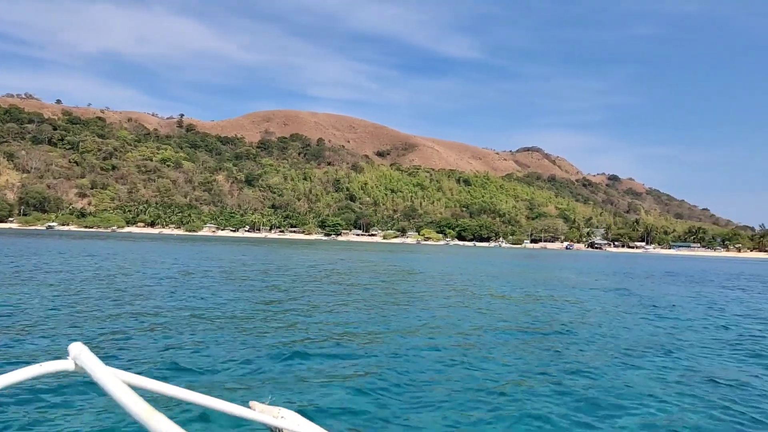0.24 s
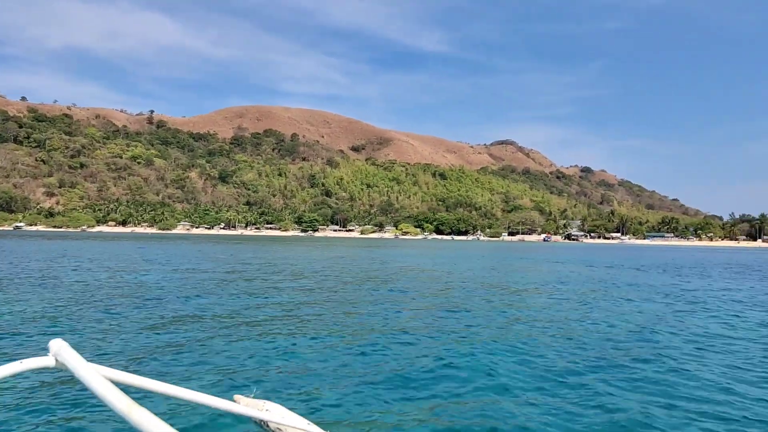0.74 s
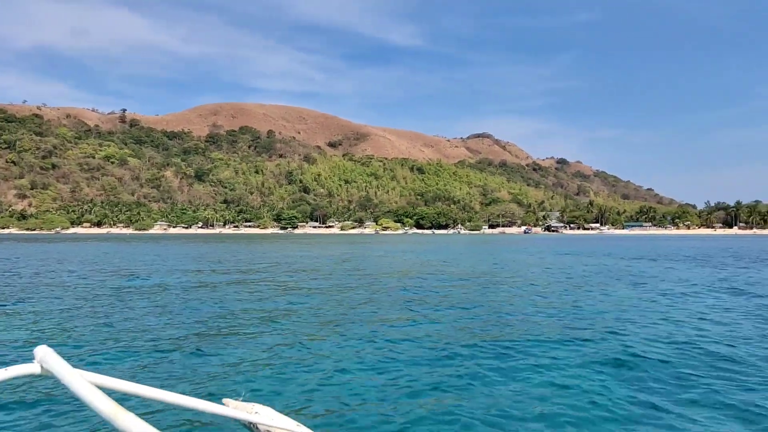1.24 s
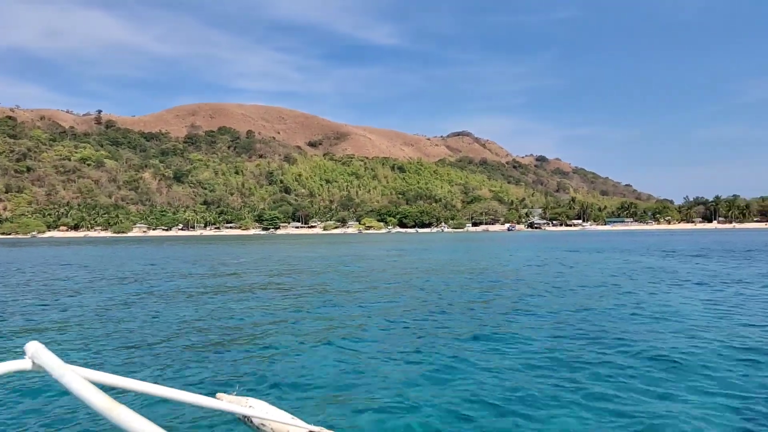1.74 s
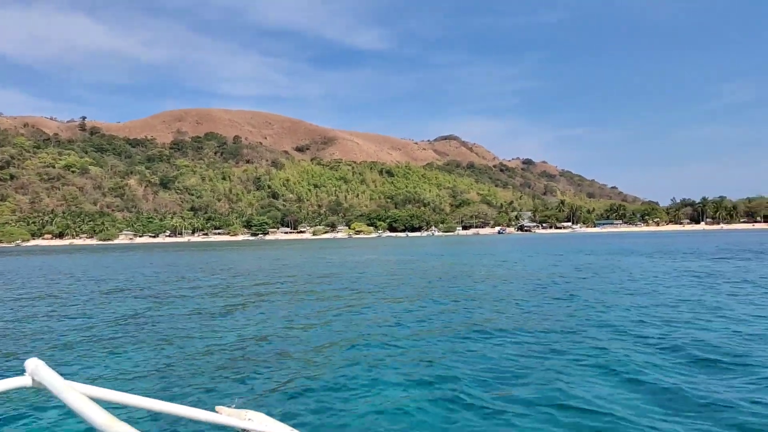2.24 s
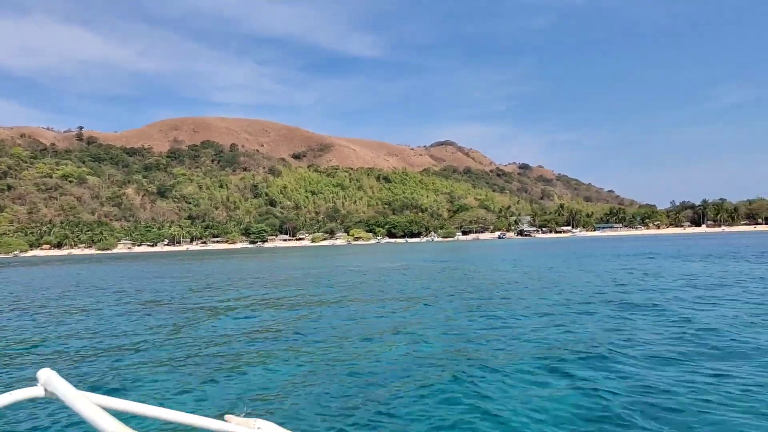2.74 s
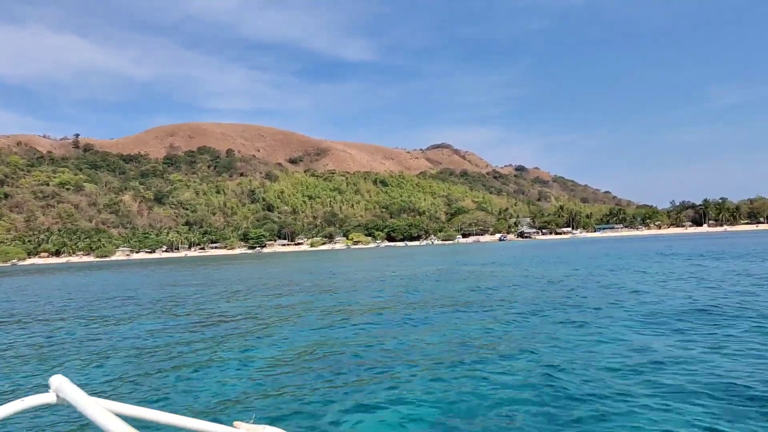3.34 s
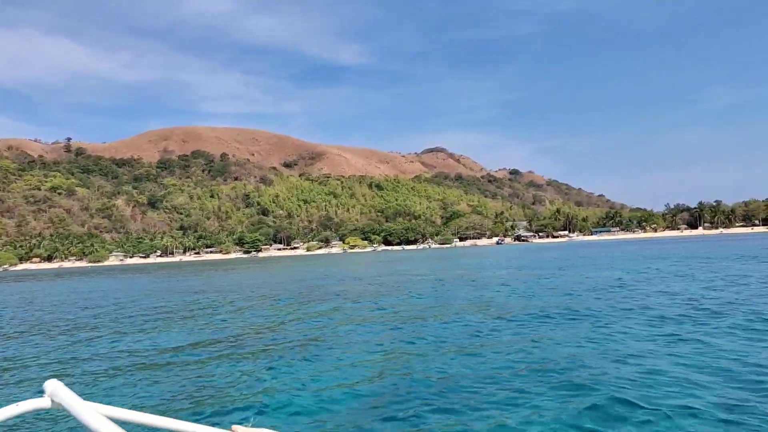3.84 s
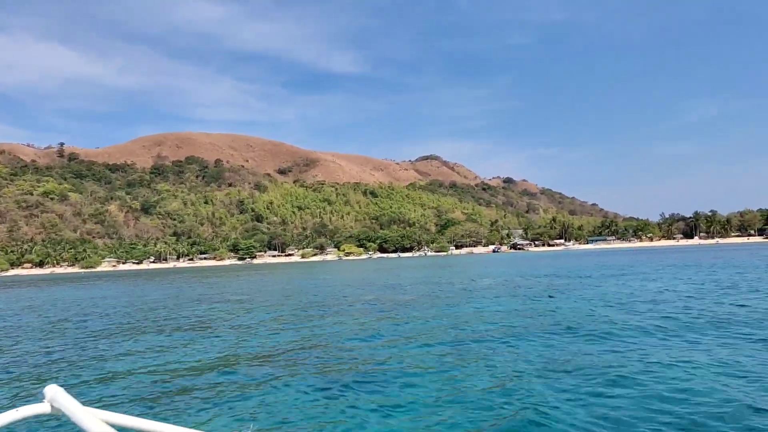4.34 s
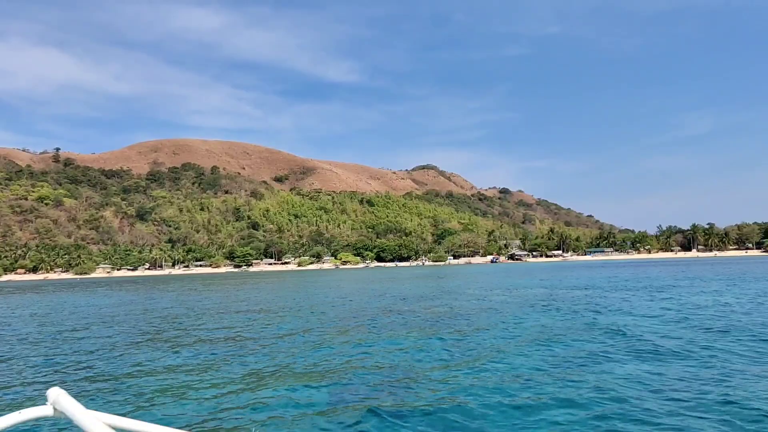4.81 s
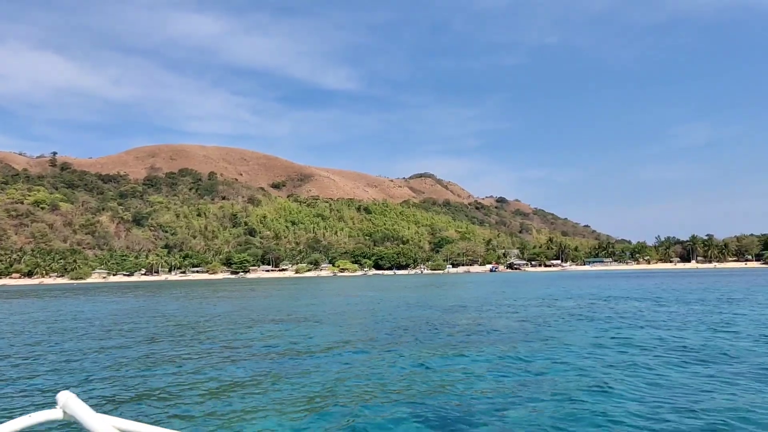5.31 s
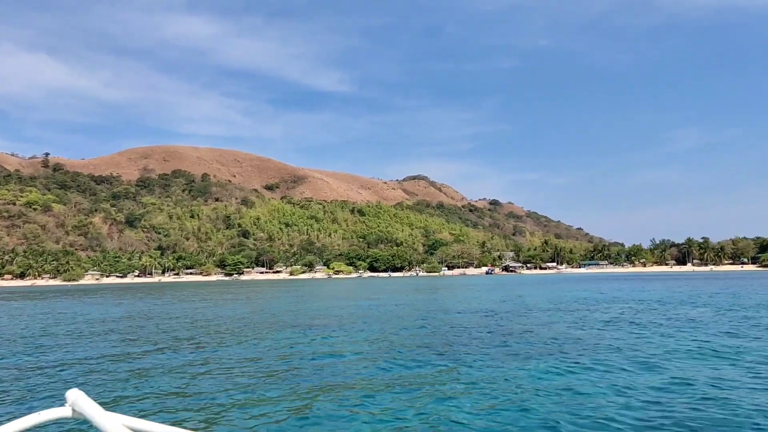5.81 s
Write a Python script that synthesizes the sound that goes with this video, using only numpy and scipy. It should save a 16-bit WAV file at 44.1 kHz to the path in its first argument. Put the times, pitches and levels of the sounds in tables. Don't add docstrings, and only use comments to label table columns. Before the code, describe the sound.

A small single-cylinder engine runs without pause on a wooden boat in open water, banging about eighteen times a second. Each beat is a low hollow thump with a short puff of hiss; loose metal rattles in step and panels hum. Soft wash runs along the planks underneath. Close, handheld stereo pickup on board, outdoors with no echo, slightly rounded on the loudest bangs.

```python
import sys
import numpy as np
from scipy import signal
from scipy.fft import rfft, irfft, next_fast_len
from scipy.io import wavfile
from scipy.ndimage import uniform_filter1d

SR = 44100
rng = np.random.default_rng(int(sys.argv[2]) if len(sys.argv) > 2 else 0)


def rack_gain(trim_db):
    fader = np.asarray(trim_db, float)
    return 10 ** (fader / 20)


def output_pcm(signal):
    pcm = np.clip(np.atleast_2d(signal).T, -1, 1) * 32767
    wavfile.write(sys.argv[1], SR, np.round(pcm).astype(np.int16))


N = 267687


def unit(x):
    return x / np.sqrt(np.mean(x ** 2) + 1e-20)


def along(points, hz):
    f, value = np.transpose(points)
    return np.interp(np.log(hz + 1), np.log(f + 1), value)


def filtered(x, response):
    m = next_fast_len(x.shape[-1] + SR // 2)
    spectrum = rfft(x, m) * response(np.fft.rfftfreq(m, 1 / SR))
    return irfft(spectrum, m)[..., :x.shape[-1]]


def mode(f, hz, width_hz):
    return 1j * f * width_hz / (hz * hz - f * f + 1j * f * width_hz)


def late(f, ms, blur_ms=0):
    return np.exp(-2j * np.pi * f * ms / 1000 - 2 * (np.pi * f * blur_ms / 1000) ** 2)


def load():
    # (time [s], level [dB])
    effort = [(0, 0.5), (.5, 0), (.8, 0.2), (.95, 1.3), (1.18, -1.1), (1.35, 0.9), (1.85, 0.5), (2.55, 1),
              (3.0, 1.3), (3.45, 1.1), (3.65, 0.6), (4.2, 1.5), (4.5, 0.7), (5.1, 1.6), (5.5, 1.34),
              (6.07, 1.5)]
    t = np.arange(N) / SR
    effort_db = np.interp(t, *np.transpose(effort))
    thump_db = -14.4 + effort_db
    hiss_db = -25.5 + 0.11 * effort_db
    wash_db = -31 + 1.7 * effort_db + 0.19 * (t - t.mean())
    return thump_db, hiss_db, wash_db


def firings():
    # (time [s], firings a second [Hz])
    speed = [
        (0.0, 18.168),
        (0.85, 18.228),
        (1.2, 18.089),
        (2.27, 17.725),
        (4.02, 17.714),
        (4.74, 17.572),
        (5.45, 17.325),
        (6.1, 17.26),
    ]
    first_s = .0307
    t = np.arange(-SR, N + SR) / SR
    cycles = np.cumsum(np.interp(t, *np.transpose(speed))) / SR
    cycles = cycles - np.interp(first_s, t, cycles)
    return np.interp(np.arange(-16, 111), cycles, t)


def odd_db(bangs):
    # (time [s], hiss over the usual [dB])
    odd_firings = [(.47, 1.5), (.58, 0), (.75, -1.5), (1.24, 1.8), (2.07, -1.2), (2.19, 0.5), (1.46, 1),
                   (1.57, 0.5), (1.85, 0.5), (2.13, 1.5), (2.25, 1), (2.36, 1), (2.64, 2), (3.03, 1),
                   (3.54, 1.5), (4.16, 1.5), (4.33, 0.5), (5.02, 0.5), (1.18, -0.5), (2.75, -2.5),
                   (3.14, -2), (4.11, -0.5), (5.15, -2), (5.45, -1.5), (5.85, 1)]
    extra = np.zeros(len(bangs))
    for s, db in odd_firings:
        extra[np.argmin(abs(bangs - s))] = db
    return extra


def train(times, sizes):
    at = (times + 1) * SR
    whole = at.astype(int)
    part = at - whole
    x = np.bincount(whole, sizes * (1 - part), N + 2 * SR)
    x = x + np.bincount(whole + 1, sizes * part, N + 2 * SR)
    return x * SR / 1000


def habit(bangs, spectrum, scatter_db):
    t = np.arange(round(.07 * SR)) / SR
    pattern = rng.standard_normal((2, len(t))) * rack_gain(-60 * t / .25)
    beats = train(bangs - .008, rack_gain(scatter_db * rng.standard_normal(len(bangs))))
    x = signal.fftconvolve(beats[None], pattern, axes=1)[:, :N + 2 * SR]
    return unit(filtered(x, lambda f: rack_gain(along(spectrum, f)))[:, SR:SR + N])


def rush(spectrum, patchy_db):
    # (frequency [Hz], left-right likeness [-1 to 1])
    likeness = [(60, 1), (300, 0.36), (630, 0.52), (1370, 0.21), (3000, 0.17), (8000, 0.033),
                (13000, 0.054)]
    z = signal.stft(rng.standard_normal((2, N + 512)), nperseg=512)[2]
    patches = uniform_filter1d(rng.standard_normal(z.shape[1:]), size=6, axis=0)
    patches = uniform_filter1d(patches, size=10, axis=1)
    pair = signal.istft(z * rack_gain(patchy_db * unit(patches)), nperseg=512)[1][:, :N]

    def spread(hz):
        angle = np.arccos(np.clip(along(likeness, hz), -1, 1)) / 2
        return rack_gain(along(spectrum, hz)) * [np.cos(angle), np.sin(angle)]

    mid, side = filtered(pair, spread)
    return unit(np.array([mid + side, mid - side]))


def water():
    # (frequency [Hz], level [dB per Hz])
    wash_spectrum = [(300, -38), (600, -3), (1000, -4), (1500, -7), (2500, -9.5), (4000, -17), (8000, -14),
                     (12000, -14), (14500, -24)]
    # (frequency [Hz], level [dB per Hz])
    rumble_spectrum = [(15, -26), (40, -13), (100, -3), (200, -5), (320, -9), (480, -17), (900, -45)]
    wash = rack_gain(load()[2] - 1.5) * rush(wash_spectrum, patchy_db=2.2)
    return wash + rack_gain(-31.5) * rush(rumble_spectrum, patchy_db=-1.0)


def valve_gear(bangs):
    # (frequency [Hz], level [dB per Hz])
    rattle_spectrum = [(300, -26), (470, -20), (560, 2.5), (645, 2), (720, -3.5), (950, -4), (1400, -12.5),
                       (2000, -1.5), (3000, -36)]
    return rack_gain(load()[2] - 9) * habit(bangs, rattle_spectrum, scatter_db=3.5)


def puffs(bangs):
    # (frequency [Hz], level [dB per Hz])
    puff_spectrum = [(300, -2.5), (500, -14), (900, -10), (1430, -14.5), (2000, -5), (3500, -11.5),
                     (7000, -11.5), (11000, -14), (14500, -24)]
    # (frequency [Hz], width [Hz], level [dB])
    casing = [(693, 15, -7), (1807, 160, -4), (3058, 74, -5), (4505, 440, -6.5), (5960, 20, -10.5)]
    t = np.arange(N) / SR
    which = np.searchsorted(bangs - .006, t) - 1
    ms = 1000 * (t - bangs[which])
    size_db = rng.standard_normal((len(bangs), 3)) * [2.1, 1.1, 3]
    size_db = size_db + odd_db(bangs)[:, None] * [2.6, 1.8, 1.5]
    spit, blow_down, tick = rack_gain(size_db)[which].T

    def burst(start_ms, rise_ms, fall_ms):
        rise = np.clip(1 - np.exp((start_ms - ms) / rise_ms), 0, 1)
        return rise * np.exp((start_ms - ms) / fall_ms)

    power = 1.6 * spit * burst(-4.5, 1.2, 3.1)
    power = power + 2.0 * blow_down * burst(-0.86, 2.1, 15.7)
    power = power + .5 * tick * burst(35, .4, 0.83)
    gate = unit(np.sqrt(power))
    gas = rush(puff_spectrum, patchy_db=2.8) * gate
    shake = rng.standard_normal((2, N)) * gate ** 2.4
    metal = filtered(shake, lambda f: sum(rack_gain(db) * mode(f, hz, width) for hz, width, db in casing))
    return rack_gain(load()[1] - 2.5) * (gas + rack_gain([[-9.5], [-13]]) * unit(metal))


def pipe(f):
    push = 1.21 * late(f, -3.07)
    echoes = sum((-.8) ** k * late(f, 5.23 * k) for k in range(4))
    slap = .77 * late(f, 19.87, .74)
    return late(f, 0, 1.8) * (push - 2.81 * echoes) - slap


def shaft_hum(bangs):
    # (shakes per cycle, mode [Hz], width [Hz], level [dB], lateness [crank degrees])
    shakes = [
        (7, 122.6, 5, -26.4, 60.8),
        (17, 294.5, 7, -28, 11.3),
        (24, 423, 45, -32.5, 1.3),
    ]
    # (time [s], level [dB])
    buzz = [
        (0, -16.5),
        (1.3, -11),
        (1.55, 0),
        (4.7, -1),
        (6.07, -2.5),
    ]
    t = np.arange(N + 2 * SR) / SR - 1
    cycles = np.interp(t, bangs, np.arange(len(bangs)))
    hum = 0
    for times, hz, width, db, degrees in shakes:
        shake = rack_gain(db) * np.cos(2 * np.pi * times * (cycles - degrees / 720))
        shake = shake * rack_gain(2.4 * rng.standard_normal(len(bangs)))[cycles.astype(int)]
        if hz > 400:
            shake = shake * rack_gain(np.interp(t, *np.transpose(buzz)))
        hum = hum + filtered(shake, lambda f: mode(f, hz, width))
    return hum


def thump(bangs):
    # (frequency [Hz], width [Hz], push by firing, by exhaust valve, by intake [signed gains])
    hull = [(43.2, 3, 2.21, -.53, 1.65), (103.9, 78.9, -.42, .92, -.46), (154.7, 6.8, -1.1, 1.45, -.58),
            (189.6, 21.6, 1.06, -1.37, 1.14), (250.4, 19.6, -.34, 1.68, 1.6),
            (283.3, 32.3, .46, -1.33, -.38), (341.8, 9.7, -.67, .14, -.13), (419.5, 3, .4, -1.8, -1.3),
            (440, 35, .33, 0, 0), (645, 12, .22, 0, 0)]
    knocks_ms = [
        -2.41,
        19.14,
        25.18,
    ]
    # (frequency [Hz], level [dB per Hz])
    flank = [(15, -20), (40, -4), (90, 7.5), (170, 3), (300, -8), (450, -12), (600, -57)]
    chance = rng.standard_normal((len(bangs), 5))
    mid = filtered(train(bangs, rack_gain(.5 * chance[:, 0] + 0.28 * odd_db(bangs))), pipe)
    for k, ms in enumerate(knocks_ms):
        force = rack_gain(0.1 * chance[:, 0] + 0.7 * chance[:, 1 + k])
        blows = train(bangs + .00003 * chance[:, 4], force)

        def ringing(f):
            return late(f, ms, 0.19) * sum(mode(f, m[0], m[1]) * m[2 + k] for m in hull)

        mid = mid + filtered(blows, ringing)
    mid = (mid + shaft_hum(bangs))[SR:SR + N]
    side = rack_gain(-32) * habit(bangs, flank, scatter_db=-0.3)[0]
    pair = mid * rack_gain([[.55], [-.45]]) + np.array([side, -side])
    level_db = load()[0]
    return pair * rack_gain(1.1 * (level_db - level_db.mean()) + 0.17)


def scene():
    bangs = firings()
    return water() + valve_gear(bangs) + puffs(bangs) + thump(bangs)


def roll_off(x):
    return signal.sosfilt(signal.butter(12, 14910, fs=SR, output="sos"), x)


def record(dry):
    # (frequency [Hz], width [Hz], level [dB])
    ports = [
        (11150, 2530, 7.5),
        (8920, 776, 14.5),
    ]
    # (frequency [Hz], left minus right [dB])
    balance = [(300, -0.5), (700, 2), (1100, 0.5), (1900, 3.5), (4000, -0.5), (14000, 1)]
    lead_ms = .057

    def port(f, resonance, sign):
        hz, width, db = resonance
        band = (f > 8) * (f < 14480)
        lift = (1 + rack_gain(db) * mode(f, hz, width)) * band
        return lift * rack_gain(sign * along(balance, f) / 2) * late(f, -sign * lead_ms)

    x = filtered(dry, lambda f: np.array([port(f, ports[0], 1), port(f, ports[1], -1)]))
    x = x / (1 + abs(x) ** 8) ** (1 / 8)
    return roll_off(x)


dry = scene()
out = record(dry)
output_pcm(out)
```